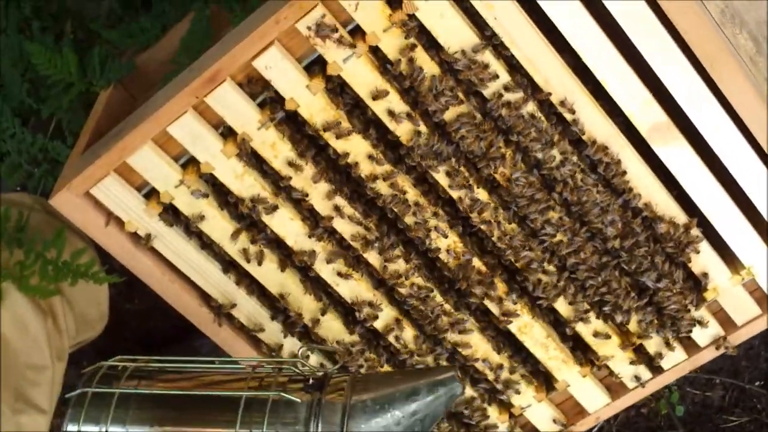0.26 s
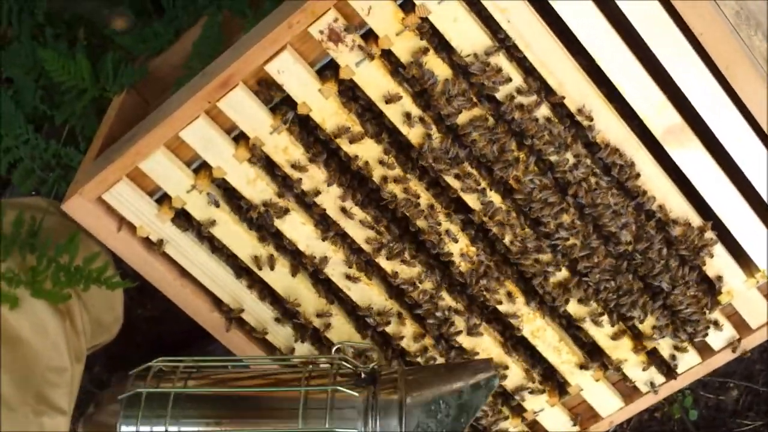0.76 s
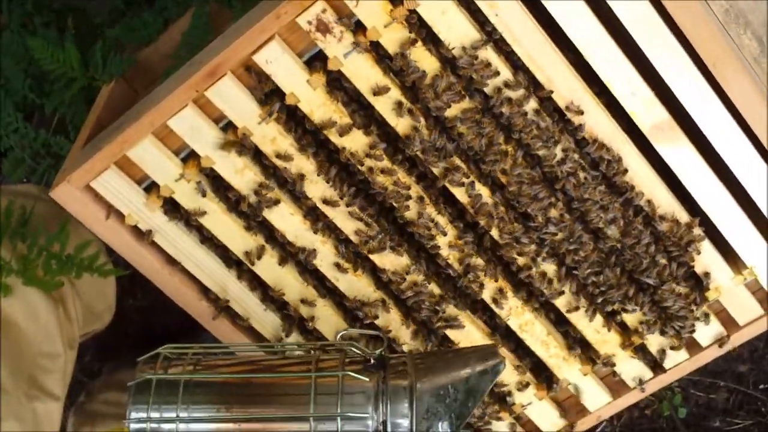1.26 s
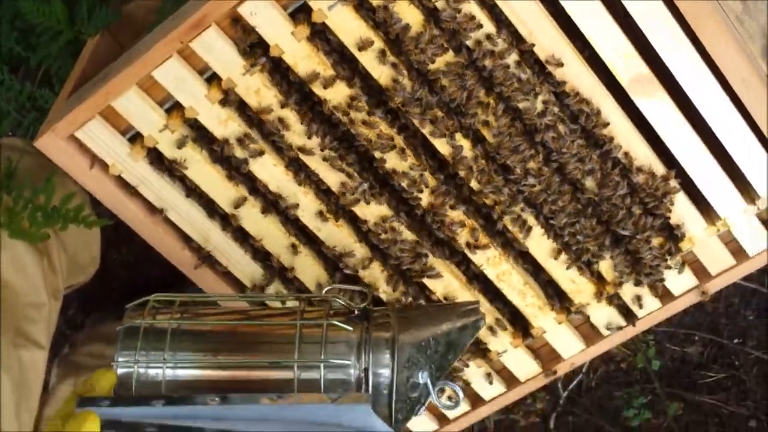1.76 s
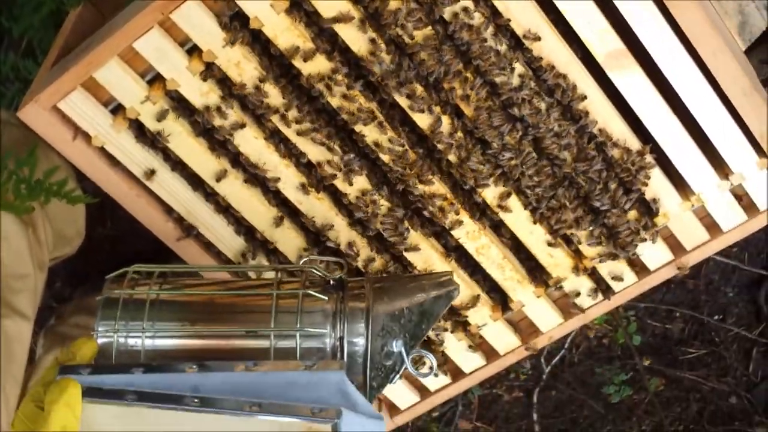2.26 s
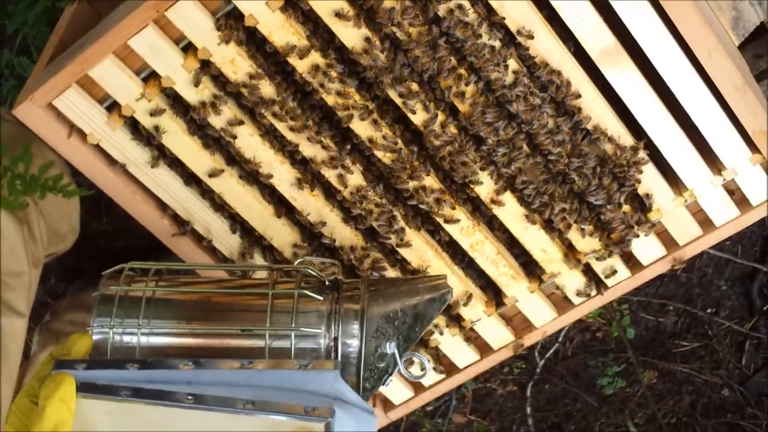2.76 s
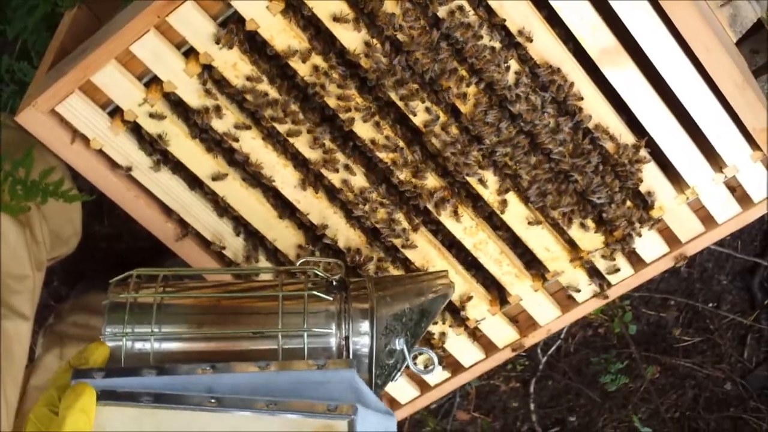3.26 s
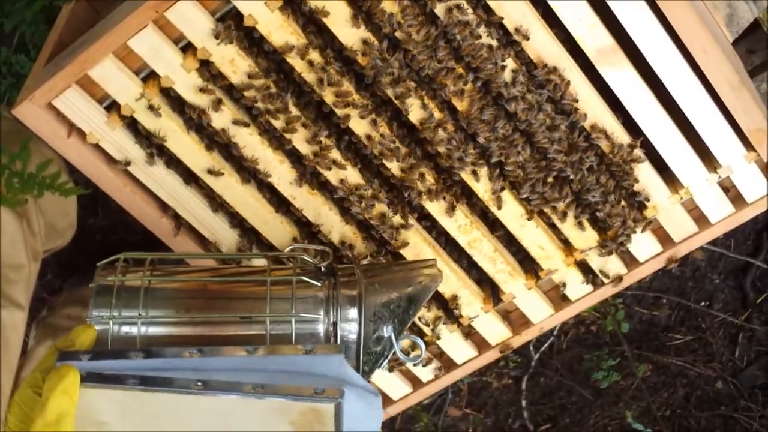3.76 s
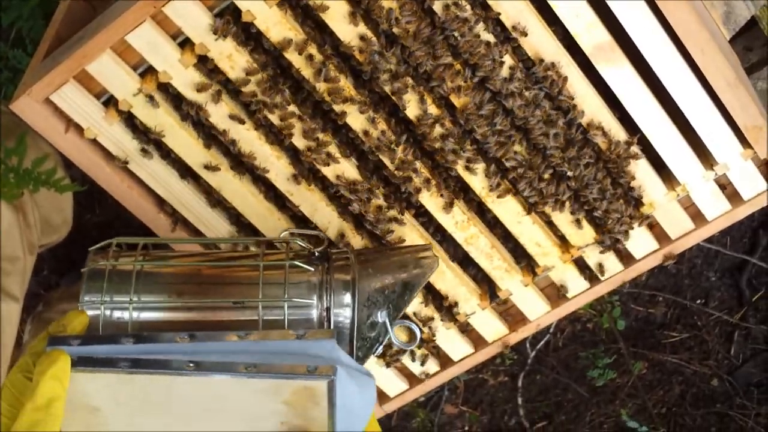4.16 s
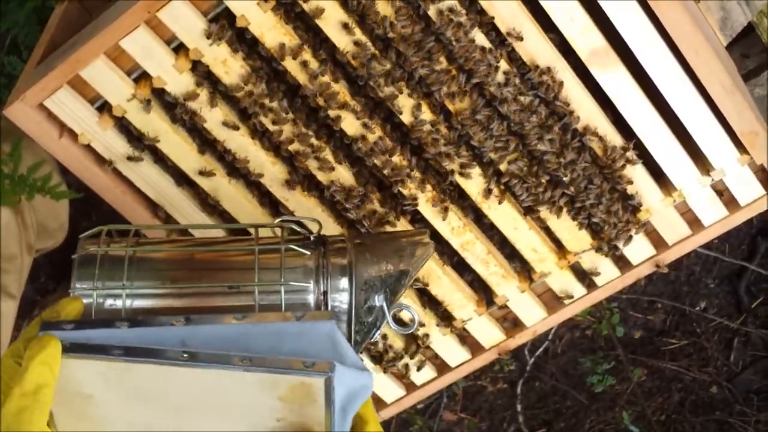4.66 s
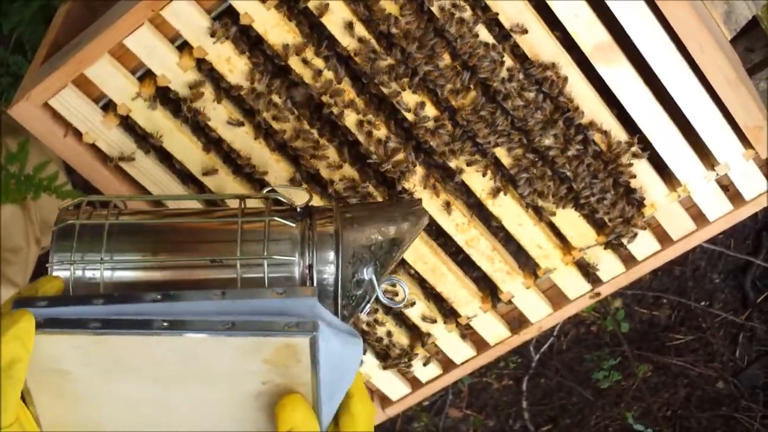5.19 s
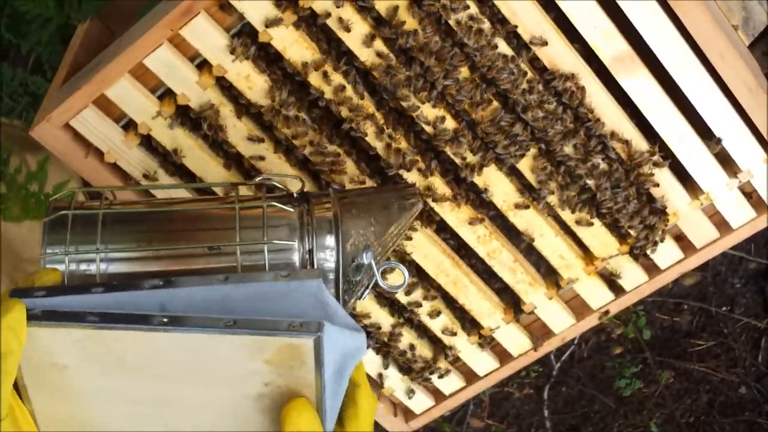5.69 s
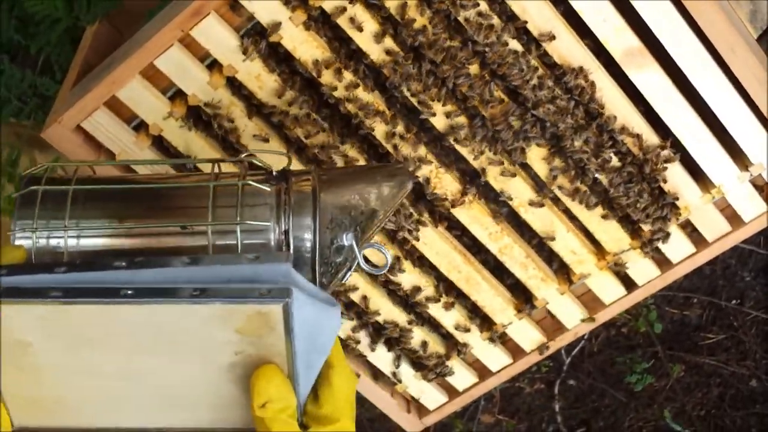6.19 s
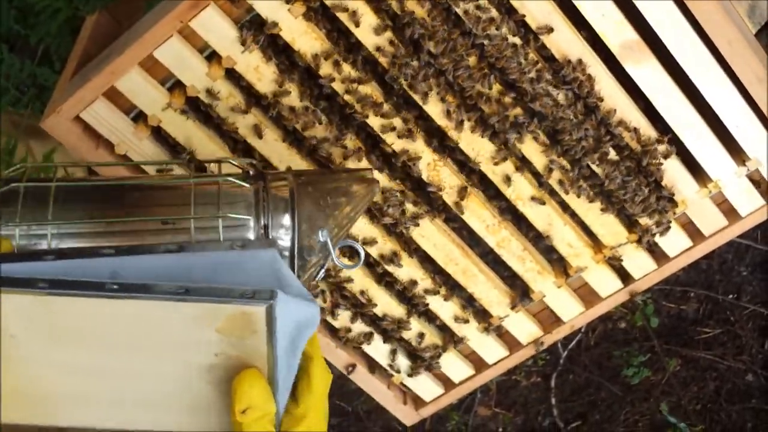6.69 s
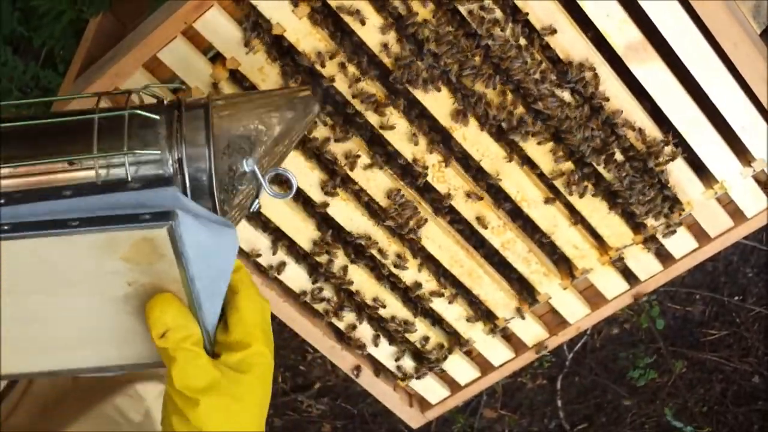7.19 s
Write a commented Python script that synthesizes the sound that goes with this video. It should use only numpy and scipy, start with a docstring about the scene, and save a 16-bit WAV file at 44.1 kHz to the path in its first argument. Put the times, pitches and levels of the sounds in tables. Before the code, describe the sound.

Close above an open hive outdoors, many bees blend into a wavering low hum over fine rustling. Soft breathy puffs, perhaps from a smoker's bellows, repeat about three times a second. Wind rumbles and thumps separately on left and right. Around a third of the way through, one bee buzzes hard against the left microphone, followed at once by violent wind blows there. Later the wind mostly eases, then knocks again near the end.

```python
"""Close above an open beehive: the colony hums and rustles, built from twelve wandering buzzes and shaped noise.
A breeze buffets the left and right microphone ports separately: rumbling noise plus single eddies that thump.
Soft puffs of air, swells of breathy noise, come about three times a second.
One bee flies right across the left port; her wingbeat, a stack of overtones, overloads it."""
import sys
import numpy as np
from scipy import signal
from scipy.fft import rfft, irfft, next_fast_len
from scipy.io import wavfile
from scipy.ndimage import map_coordinates

SR = 44100
rng = np.random.default_rng(int(sys.argv[2]) if len(sys.argv) > 2 else 0)


def master(y):
    """Save y as 16-bit WAV."""
    cut = np.clip(np.atleast_2d(y).T, -1, 1)
    pcm = np.round(cut * 32767)  # scale
    wavfile.write(sys.argv[1], SR, pcm.astype(np.int16))


N = 327940
TIME = np.arange(N) / SR  # seconds


def undb(db):
    """Turn decibels into a gain."""
    return 10 ** (np.asarray(db) / 20)


def unit(x):
    """Scale to an average (rms) strength of 1."""
    return x / np.sqrt(np.mean(x ** 2))


def curves(table):
    """Join each column of a table by straight lines in time."""
    seconds, *columns = np.transpose(table)
    return [np.interp(TIME, seconds, column) for column in columns]


def walk(rate):
    """Wander smoothly at random, with about rate turns a second and a spread near 1."""
    points = rng.standard_normal(int(N / SR * rate) + 4)
    return map_coordinates(points, [TIME * rate + 1], order=2)


def noise(colour):
    """Make noise of rms 1 whose spectrum follows (Hz, dB) points, silent below the first."""
    point_hz, point_db = np.transpose(colour)
    size = next_fast_len(N)
    hz = np.arange(size // 2 + 1) * SR / size
    gain = undb(np.interp(np.log(hz + 1), np.log(point_hz), point_db)) * (hz > point_hz[0])
    spectrum = rfft(rng.standard_normal(size)) * gain
    return unit(irfft(spectrum, size)[:N])


def pair(colour, alike):
    """Make left and right noise that share the part alike of their power."""
    alike = np.clip(alike, 0, 1)
    shared = noise(colour)
    separate = np.array([noise(colour), noise(colour)])
    return np.sqrt(alike) * shared + np.sqrt(1 - alike) * separate


def pan(left_db):
    """Gains of the two ports when the left is left_db stronger than the right."""
    return undb(np.array([[left_db], [-left_db]]) / 2)


def swell(s, rise_s, fall_s, order=2):
    """A rise and fall that peaks at 1: a bell at order 2, flatter on top and steeper at higher orders."""
    distance = np.abs(TIME - s) / np.where(TIME < s, rise_s, fall_s)
    return np.exp(-.5 * np.minimum(distance, 5) ** order)


def add_eddy(port, s, hz, size):
    """One eddy crossing a port swings the pressure to one side and back to the other, faster if it is small."""
    first = max(int((s - .7 / hz) * SR), 0)
    i = np.arange(first, min(int((s + .7 / hz) * SR), N))
    u = 2 * np.pi * hz * (i / SR - s)
    port[i] += size * u * np.exp((1 - u ** 2) / 2)


# Tone colour of the rustling. Each row: pitch in Hz, strength in dB per Hz.
RUSTLE_COLOUR = [(40, 20.5), (130, 7), (300, 6.5), (700, 2.5), (1500, 3.5), (2100, -2.5), (3200, -6),
                 (4400, -3), (6300, 2), (9000, -6.5), (12000, -13.5), (15000, -20)]
# How busy the frames are. Each row: time in seconds, rustle level in dB before a small overall gain.
FRAME_ACTIVITY = [(0, -37), (1.5, -37), (3, -35.5), (4.5, -37), (6.8, -35.5), (7.2, -33.5), (7.44, -35.5)]


def rustle(gain_db=0.56, left_db=-1.45):
    """Countless legs and wings on the comb merge into a fine, even hiss."""
    level_db, = curves(FRAME_ACTIVITY)
    flicker = undb(.4 * walk(25) + .4 * walk(7))
    return pan(left_db) * pair(RUSTLE_COLOUR, alike=0.24) * undb(level_db + gain_db) * flicker


def colony(count=12, wing_hz=246, spread=.055, waver=.012, swell_db=5, hum_db=-45.5):
    """Bees further off, each on her own wandering wingbeat, swelling and fading as they circle."""
    cycle = np.arange(512) / 512
    harmonics_db = [-9.5, 6.5, -4, -26, -6.0, -8, -11.5, -32, -31, -38]
    out = np.zeros((2, N))
    for bee in range(count):
        # one wing stroke: overtones that start at random points of their cycle
        stroke = sum(undb(db) * np.cos(2 * np.pi * (k * cycle + rng.random()))
                     for k, db in enumerate(harmonics_db, start=1))
        own_pitch = spread * rng.standard_normal()
        hz = wing_hz * (1 + own_pitch + .035 * walk(3.4) + waver * walk(35))
        # repeat the stroke at the wandering pitch
        buzz = np.interp(np.cumsum(hz) / SR % 1, cycle, stroke)
        out += pan(4 * rng.standard_normal()) * buzz * undb(swell_db * walk(2.617))
    return undb(hum_db) * unit(out)


# Steady part of the breeze on each port. Each row: time in seconds, level in dB before flutter and gusts.
LEFT_BREEZE = [(0, -25), (1.06, -18.5), (1.4, -23), (1.68, -33.5), (1.8, -27), (2.5, -18.5), (2.63, -25),
               (2.75, -16.5), (3.2, -19), (3.42, -13.5), (3.62, -30.5), (3.78, -19.5), (4.7, -25.5),
               (5.3, -30.5), (6.48, -28.5), (6.6, -20.5), (6.97, -15), (7.44, -30)]
RIGHT_BREEZE = [(0, -17), (.87, -15.5), (1.05, -15.5), (2.52, -17), (2.68, -32), (2.75, -16.5),
                (3.58, -18.5), (3.74, -35), (3.92, -25), (4.75, -17.5), (4.95, -37.5), (5.3, -59),
                (6.6, -58), (6.98, -32), (7.1, -19), (7.44, -37)]
# Gusts that stand out. Each row: middle in seconds, port (0 left, 1 right), level in dB, length in seconds.
STRONG_GUSTS = [(0.271, 1, -13.5, 0.067), (0.377, 0, -17.5, 0.096), (2.697, 0, -3, 0.027),
                (2.753, 0, -1, 0.039), (2.813, 0, 2, 0.046), (2.835, 1, -13, 0.072), (2.938, 0, -3.5, 0.04),
                (3.007, 0, -3, 0.085), (3.02, 1, -17, .06), (3.359, 1, -14, 0.062),
                (3.441, 0, -11.5, 0.085), (4.018, 1, -17, 0.061), (4.353, 1, -17.5, 0.053),
                (5.119, 0, -20, 0.05), (5.639, 0, -18, 0.063), (5.892, 0, -17.5, 0.14),
                (6.243, 0, -15.5, 0.061), (6.39, 0, -15, 0.052), (7.052, 1, -16, 0.066)]


def wind_level(port, flutter_db=2.5, flutter_hz=16):
    """Strength of the wind on one port in dB: a fluttering breeze, with abrupt gusts on top."""
    breeze_db, = curves((LEFT_BREEZE, RIGHT_BREEZE)[port])
    power = undb(breeze_db + flutter_db * np.minimum(walk(flutter_hz), 1)) ** 2
    for s, side, db, length_s in STRONG_GUSTS:
        if round(side) == port:
            gust = undb(db) * swell(s, length_s / 2, length_s / 2, order=4)
            power = power + gust ** 2
    return 10 * np.log10(power)


# Tone colour of the wind's rumble. Each row: pitch in Hz, strength in dB per Hz.
RUMBLE_COLOUR = [(15, -5), (30, -2), (60, 1), (120, -1.5), (200, -7.5), (300, -14), (500, -32.5),
                 (900, -37.5), (3000, -64.5)]


def buffeting(level_db, gain_db, count=1300, eddy_hz=150, octaves=0.49, speed_up=0.27, scatter_db=3,
              eddy_db=-2, surge=0.35):
    """Turbulence on one port: a low rumble and clusters of small eddies that pass faster in a gust."""
    swirl = np.zeros(N)
    times = (np.arange(count) + rng.random(count)) / count * (N - 1) / SR
    cluster = walk(32).clip(-1.6, 1.6)
    chances = rng.standard_normal((count, 3)).clip(-2, 2)
    for s, (small, strong, side) in zip(times, chances):
        i = int(s * SR)
        # eddies in a cluster are both stronger and smaller
        hz = eddy_hz * 2 ** (octaves * small + 0.25 * cluster[i])
        hz = hz * undb(speed_up * (level_db[i] + 19.5))
        size_db = scatter_db * strong - 1.6 * small + 6.1 * cluster[i]
        add_eddy(swirl, s, hz, np.sign(side) * undb(size_db))
    # the hardest gusts break away from the port's edge and churn it even more
    churn_db = eddy_db + surge * np.maximum(level_db + 7.5, 0)
    return (noise(RUMBLE_COLOUR) + undb(churn_db) * unit(swirl)) * undb(level_db + gain_db)


def stray_eddies(level_db, count, above_db, eddy_hz=310, octaves=0.4, scatter_db=1.5, ceiling_db=-10):
    """Now and then a small, quick eddy knocks on the port, harder in stronger wind up to a ceiling."""
    out = np.zeros(N)
    for k, (when, small, strong) in enumerate(rng.uniform(-1, 1, (count, 3))):
        s = (k + .5 + when / 2) / count * (N - 1) / SR
        db = min(level_db[int(s * SR)], ceiling_db) + above_db + 2 * scatter_db * strong
        add_eddy(out, s, eddy_hz * 2 ** (octaves * small), undb(db))
    return out


# The hardest eddies. Each row: middle in seconds, port (0 left, 1 right), peak in dB,
# pitch in Hz before the eddy is stretched in time.
HARD_EDDIES = [(0.288, 1, 0, 410), (0.486, 1, -9, 355), (0.763, 1, 1, 450), (0.819, 1, -5.5, 470),
               (0.84, 1, 3, 397), (0.88, 1, .5, 300), (1.172, 1, 1, 354), (1.264, 1, 1.5, 335),
               (1.892, 1, -7, 445), (2.181, 1, -6, 264), (2.741, 0, 5.5, 513), (2.769, 0, 2, 418),
               (2.796, 0, 3.5, 330), (2.808, 0, 8, 503), (2.92, 0, 4, 300), (3.001, 0, 13.5, 445),
               (3.021, 0, 11.5, 600), (3.113, 0, -7, 292), (3.262, 1, -8, 400), (3.351, 1, 0, 560),
               (3.408, 0, 7.5, 388), (3.443, 0, -4, 340), (3.555, 1, -2, 350), (4.032, 1, -10.5, 305),
               (4.688, 1, -11, 368), (4.259, 1, -5.5, 344), (5.855, 0, -11, 260), (6.382, 0, -9.5, 252),
               (6.618, 0, -3.5, 213), (6.785, 0, -5.5, 345), (6.93, 0, 2.5, 250), (6.962, 0, -8, 394),
               (7.05, 1, -4.5, 300), (7.181, 0, 2.5, 470)]


def eddies(stretch=1.184, count=3, wake_db=-7, wake_s=0.01093):
    """The strongest eddies thump the ports, each among a few weaker companions just before or after."""
    out = np.zeros((2, N))
    companions = rng.uniform(-1.036, 1, (len(HARD_EDDIES), count, 3))
    for (s, port, db, hz), wake in zip(HARD_EDDIES, companions):
        side = out[int(round(port))]
        add_eddy(side, s, hz / stretch, undb(db))
        for lag, slow, strong in wake:
            # a negative strength turns the swing upside down
            add_eddy(side, s + wake_s * lag, hz / 2 ** abs(slow), undb(db + wake_db) * strong)
    return out


def wind():
    """The breeze strikes each port on its own, so left and right rumble and thump separately."""
    left_db, right_db = wind_level(port=0), wind_level(port=1)
    left = buffeting(left_db, gain_db=0.0) + stray_eddies(left_db, count=30, above_db=0)
    right = buffeting(right_db, gain_db=-2.5) + stray_eddies(right_db, count=28, above_db=4)
    return np.array([left, right]) + eddies()


# Tone colour of the puffs. Each row: pitch in Hz, strength in dB per Hz.
PUFF_SPECTRUM = [(40, 14), (130, -7.5), (230, 13.5), (350, 2.5), (500, -1.5), (680, -13), (1150, 1.5),
                 (1600, 0), (2100, -12.5), (2600, -10), (3200, -21), (4400, -18.5), (6300, -11),
                 (9000, -21.5), (14000, -32)]
# Force of the puffs. Each row: time in seconds, level in dB before a quick flutter.
PUFF_STRENGTH = [(0, -31), (1.1, -26.5), (1.7, -28), (2.7, -27.5), (4.1, -29), (4.8, -27.5), (5.72, -29.5),
                 (6.06, -26), (7, -32)]


def puffs(first_s=-.033, every_s=.3246, quicken_s=.00047, rise_s=0.032, fall_s=0.031, flutter_db=1.5,
          left_db=-6, refill_s=0.16, refill_db=-15):
    """Short breathy swells of air, perhaps from the smoker's bellows, with a fainter draw between them."""
    force_db, = curves(PUFF_STRENGTH)
    # the beat quickens slightly: each interval is quicken_s shorter than the last
    intervals = every_s - quicken_s * np.arange(int(N / SR / every_s) + 1)
    starts = first_s + np.append(0, np.cumsum(intervals))
    flow = sum(swell(s, rise_s, fall_s) for s in starts)
    flow = flow + undb(refill_db) * np.interp(TIME - refill_s, TIME, flow)
    strength = undb(force_db + flutter_db * walk(120))
    return pan(left_db) * pair(PUFF_SPECTRUM, alike=0.56) * flow * strength


# Overtones of one wing stroke. Each row: overtone number (1 is the wingbeat itself),
# level in dB before effort and distance change it.
WING_STROKE = [(1, -0.5), (2, -4.5), (3, -11), (4, -24), (5, -13.5), (6, -17.5), (7, -32), (9, -27),
               (12, -30), (18, -33)]
# Her wingbeat, which shows her effort. Each row: time in seconds, wingbeat in Hz before lift and jitter.
WINGBEAT_CURVE = [(2.2, 272), (2.26, 252), (2.335, 235), (2.45, 234), (2.482, 264), (2.535, 249),
                  (2.595, 236), (2.64, 250)]
# Her path. Each row: time in seconds, distance from the left port in cm.
FLIGHT_PATH = [(2.05, 62), (2.31, 3.5), (2.356, 0.77), (2.395, 1.25), (2.455, 1.3), (2.495, 1.02),
               (2.558, 0.67), (2.594, 2.1), (2.8, 21)]
# Tone colour of her downwash, the air her wings push down. Each row: pitch in Hz, strength in dB per Hz.
WASH_COLOUR = [(60, 0), (300, 12.5), (900, 3.5), (2500, -7), (7000, -13), (15000, -26.5)]
# Her downwash sweeping over the port. Each row: middle in seconds, level in dB before distance weakens it,
# half width in seconds.
WASH_SWEEPS = [(2.364, 1, .008), (2.555, -8.5, 0.0119)]


def close_bee(near_field=0.3, tone_db=-2.5, right_db=-33, draught_db=-25, wake_db=-15, wake_s=0.047,
              lift_hz=42, easy_hz=245, mid_edge_db=-2, edge_swing_db=6, effort_hz=9, edge_lag_s=.02,
              far_edge_db=9, unsteady_db=2.4):
    """Each wing stroke is a pressure pulse, brighter with effort; at the port her downwash rasps once a stroke."""
    beat_hz, = curves(WINGBEAT_CURVE)
    cm = np.maximum(curves(FLIGHT_PATH)[0], .5)
    level_db = -2 * 20 * np.log10(cm)
    # each sweep has a weaker, broader wake; a faint draught is always there
    sweep = sum(undb(db) * swell(s, width, width) for s, db, width in WASH_SWEEPS)
    wake = sum(undb(db + wake_db) * swell(s, wake_s, wake_s) for s, db, width in WASH_SWEEPS)
    downwash = np.sqrt(sweep ** 2 + wake ** 2 + undb(draught_db) ** 2)
    # she beats faster as she brushes past the port
    hz = beat_hz + lift_hz * sweep
    # the upper overtones follow her effort a moment late and carry further than the low ones
    late_hz = np.interp(TIME - edge_lag_s, TIME, beat_hz)
    effort = np.tanh((late_hz - easy_hz) / effort_hz)
    edge_db = mid_edge_db + edge_swing_db * effort + far_edge_db * np.clip(np.log2(cm) - .5, 0, 1)
    # strokes grow irregular in her own downwash
    jitter = .008 + .7 * np.minimum(downwash, undb(-7)) ** 2
    phase = 2 * np.pi * np.cumsum(hz * (1 + jitter * walk(200))) / SR
    order, order_db = np.transpose(WING_STROKE)

    def partial(k):
        """One overtone, with levels missing from the table filled in between its neighbours."""
        return undb(np.interp(k, order, order_db)) * np.cos(k * phase)

    body = sum(partial(k) * undb(unsteady_db * walk(50)) for k in range(2, 5))
    edge = sum(partial(k) * undb(2 * walk(40)) for k in range(5, 19))
    # the wingbeat itself is a near field: it dies faster with distance than the overtones do
    fundamental = undb(near_field * (level_db + 4)) * partial(1)
    tone = fundamental + body + undb(edge_db) * edge
    wash = noise(WASH_COLOUR) * (1 + .7 * np.sin(phase))
    bee = undb(level_db) * (undb(tone_db) * tone + downwash * wash)
    return np.array([bee, undb(right_db) * bee])


def scene():
    """The hive, the wind on both ports, the puffs and the close bee together."""
    return rustle() + colony() + wind() + puffs() + close_bee()


def record(dry):
    """The input stage flattens peaks near full scale, then a steep filter cuts the top."""
    clipped = dry / (1 + np.abs(dry) ** 8) ** (1 / 8)
    top_cut = signal.ellip(10, .2, 70, 14600, fs=SR, output="sos")  # cut above 14600 Hz
    return signal.sosfilt(top_cut, clipped)


dry = scene()
out = record(dry)
master(out)
```